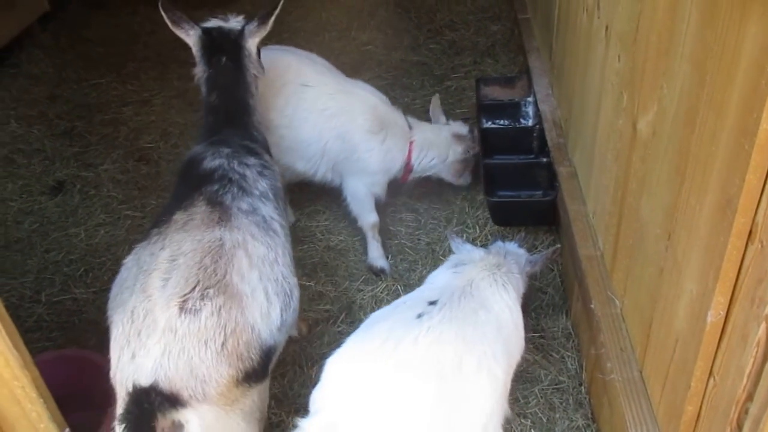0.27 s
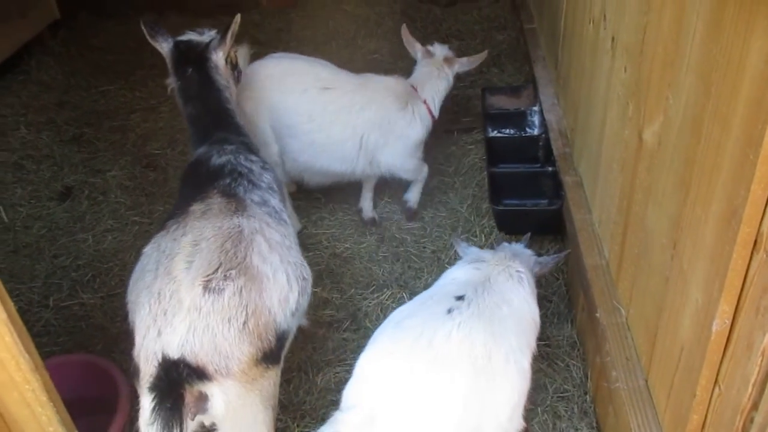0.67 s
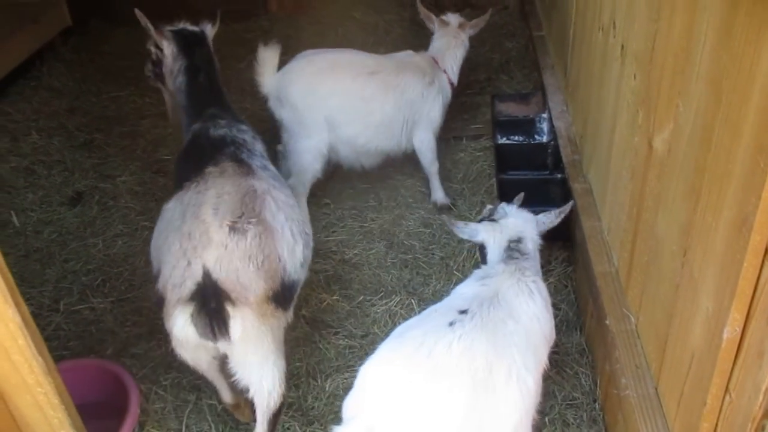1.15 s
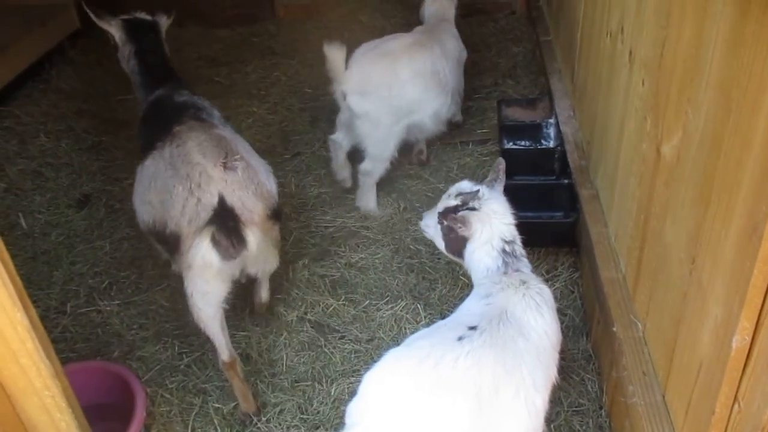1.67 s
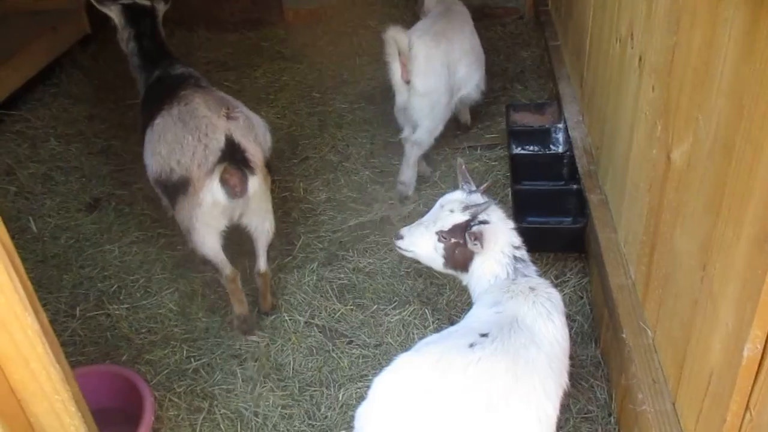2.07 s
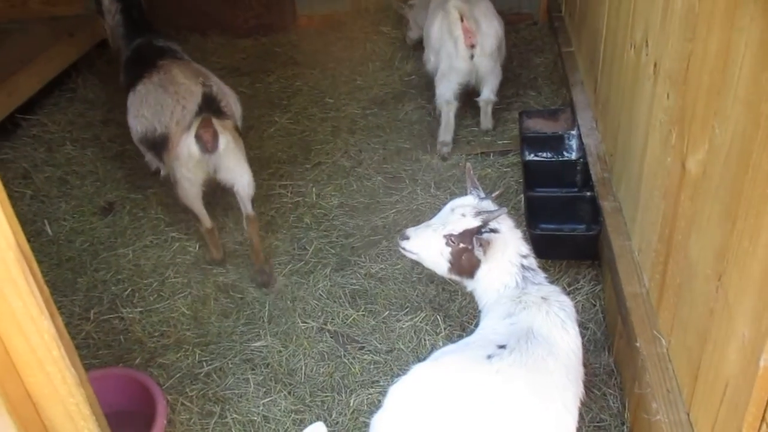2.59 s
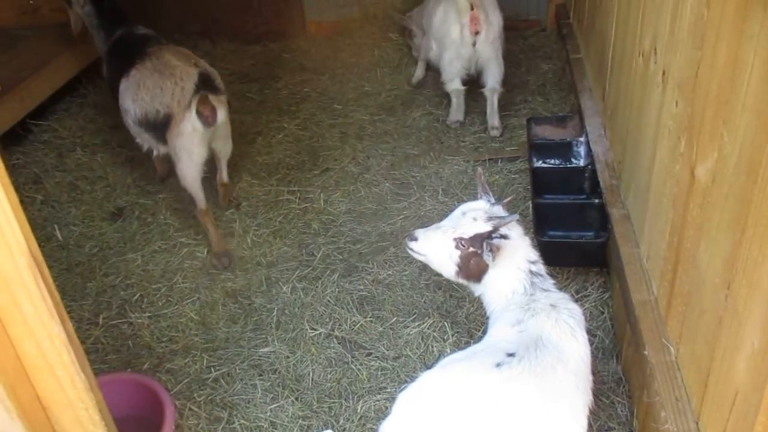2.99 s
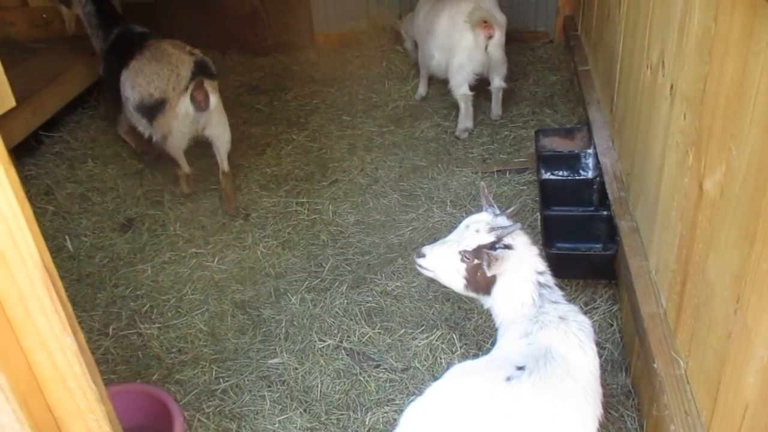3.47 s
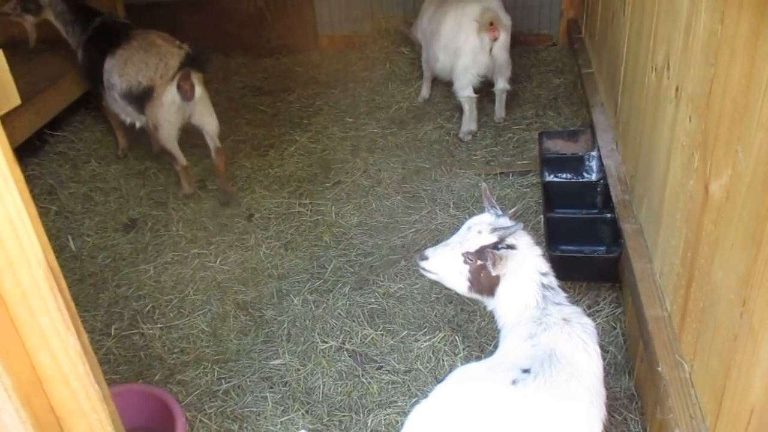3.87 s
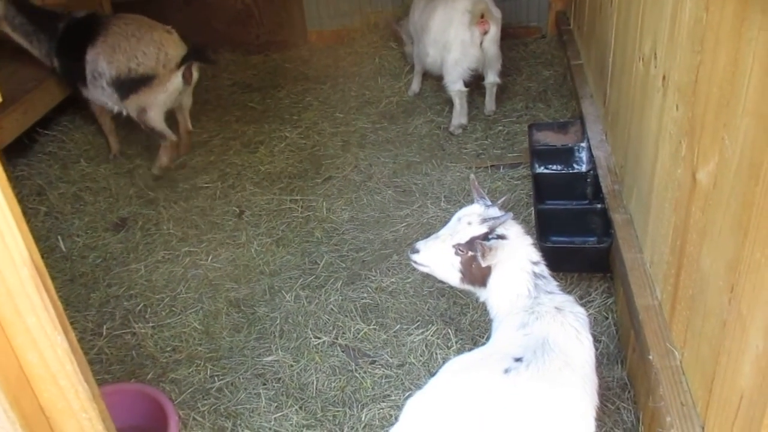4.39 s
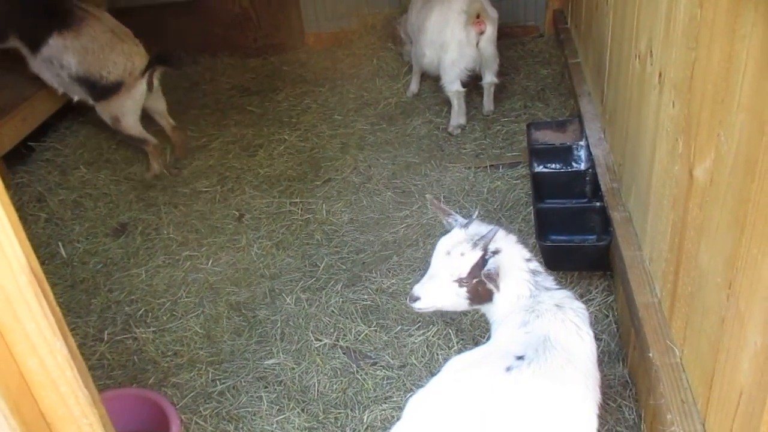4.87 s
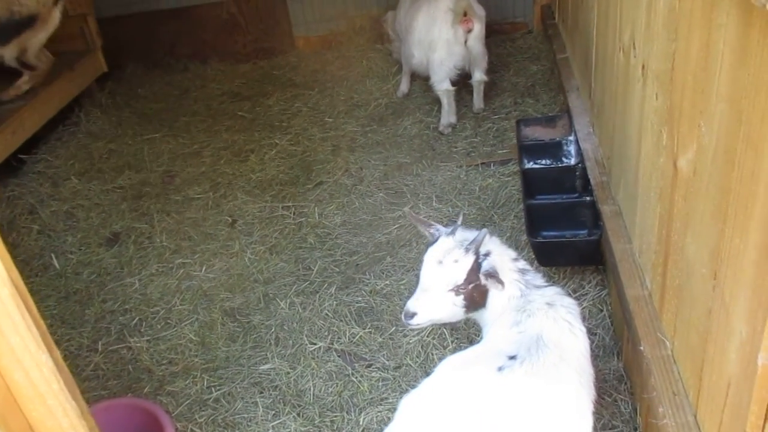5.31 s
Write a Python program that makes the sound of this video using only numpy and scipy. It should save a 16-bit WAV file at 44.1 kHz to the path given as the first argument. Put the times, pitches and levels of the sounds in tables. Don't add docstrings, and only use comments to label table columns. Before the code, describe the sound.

Close handheld sound in a straw-floored goat pen: crisp stalk snaps first, then a stuttering bleat of rapid puffs that sinks to a breathy end. Dull wind-like bumps and light wooden taps follow, then a faint distant bleat. Near the end a shelf drags with squeaky friction and bangs hard, planks ringing briefly, with short shed echo and low air noise throughout.

```python
import sys
import numpy as np
from scipy import signal
from scipy.fft import rfft, irfft, next_fast_len
from scipy.io import wavfile
from scipy.ndimage import uniform_filter1d, map_coordinates

SR = 44100
rng = np.random.default_rng(int(sys.argv[2]) if len(sys.argv) > 2 else 0)


def linear_from_db(decibels):
    return 10 ** (np.asarray(decibels, float) / 20)


def dump(signal):
    limited = np.clip(np.atleast_2d(signal).T, -1, 1)
    pcm = np.round(limited * 32767).astype(np.int16)
    wavfile.write(sys.argv[1], SR, pcm)


N = 244511
TIME = np.arange(N) / SR

# (peak time [s], level [dB], top pitch [Hz], mouth opening [0-1], upper throat resonance [Hz])
NEAR_BLEAT = [
    (.749, -21.5, 451.6, 0.77, 1680),
    (.841, -21.5, 519.3, 0.91, 1652),
    (.934, -22, 541, 0.92, 1675),
    (1.023, -24, 528.4, 0.75, 1650),
    (1.114, -24, 514, .62, 1590),
]
# (peak time [s], level [dB], top pitch [Hz], mouth opening [0-1], upper throat resonance [Hz])
FAR_BLEAT = [
    (3.334, -37.5, 431, 0.06, 1320),
    (3.43, -42, 503, 0.4, 1580),
    (3.525, -40.5, 522, 0.7, 1610),
    (3.62, -42.5, 532, 0.57, 1620),
    (3.71, -42.5, 547, .35, 1660),
    (3.809, -45, 544, 0.36, 1650),
]
# (time [s], level [dB], pitch [Hz], mouth opening [0-1])
GRUNT = [
    (.609, -40, 332, 1),
    (.619, -25, 296.3, 0.74),
    (.636, -16.5, 308, .5),
    (.65, -19.5, 321.6, 0.35),
    (.664, -30.5, 314, 1),
    (.682, -61, 312, 0.68),
]
# (time [s], level [dB], pitch [Hz], mouth opening [0-1])
SIGH = [
    (1.165, -34, 441, .4),
    (1.18, -32.5, 446.6, .25),
    (1.204, -32, 445, 0.1),
    (1.22, -40, 426.4, 0.84),
    (1.24, -41, 384, 0.75),
    (1.265, -43, 335, 0.6),
    (1.30, -43, 303, .9),
    (1.335, -52, 295, 0.9),
]
# (time from peak [s], level under peak [dB], fold tension [0-1], mouth wider by [0-1])
NEAR_PUFF = [
    (-.046, -17.5, .6, 0.16),
    (-.03, -6.5, .78, 0.11),
    (-.013, -1.5, .86, 0.0083),
    (0, -1, 1.01, 0.18),
    (0.016, -11.5, .75, .15),
    (0.039, -18.5, 0.24, 0.022),
]
# (time from peak [s], level under peak [dB], fold tension [0-1], mouth wider by [0-1])
FAR_PUFF = [
    (-.022, -25, 1.04, 0.25),
    (-.006, -.5, 1.01, .01),
    (.014, -3.5, .98, 0.09),
    (0.023, -16, 1.01, 1),
    (.055, -21, 1.15, .95),
]
# (lift near 900 Hz [dB], nasal shine above 3.4 kHz [dB], growth of shine [dB/s])
NEAR_THROAT = (5.4, -3.6, 16.4)
FAR_THROAT = (1.8, 10, 2)
# (upper resonance [Hz], lift near 900 Hz [dB], nasal shine above 3.4 kHz [dB])
GRUNT_THROAT = (1500, 5.3, -6)
SIGH_THROAT = (1650, 3.7, 2)
# (frequency [Hz], level [dB])
MOUTH_SHUT = [(250, 31), (450, -3.5), (650, -16), (1000, -15), (1500, -25), (1900, -27.5), (3000, -40.5),
              (6000, -66)]
# (frequency [Hz], level [dB])
MOUTH_OPEN = [(250, 9), (500, -0.5), (1000, -8.5), (1580, 1), (2100, -23), (2600, -19), (3200, -11.5),
              (3900, -23), (4700, -15), (5500, -34.5), (8000, -37)]
SLACK_HZ = 300.4

# (time [s], peak level [dB], ringing plank [Hz], brightness [dB], rattle t60 [ms])
BANGS = [(1.012, -28, 216, -67, 145), (2.292, -30.5, 750, -33, 33), (2.47, -27, 276, -63, 89),
         (2.581, -32, 749, -11, 61), (2.699, -37.5, 342, -63, 116), (4.65, 2.5, 900, -15.5, 36),
         (4.686, -20.5, 480, -35, 120), (4.98, -15.5, 1345, -3.5, 116), (5.035, -16, 872, -26, 230),
         (5.064, -4, 843.3, -12, 97), (5.226, -8, 387, -10, 82), (5.245, -10.5, 810, -23, 110),
         (5.295, -6, 550, -29, 122)]
# (frequency [Hz], width [Hz], level [dB])
PLANKS = [(175, 18, 2.5), (330, 92, -0.5), (480, 150, -3), (701, 110, -6.5), (832, 84, 1), (980, 216, -8),
          (1320, 130, -11.5), (1505, 140, -13), (1930, 150, -16), (2200, 180, -15), (3350, 2900, -25.5)]
# (time [s], peak level [dB], frequency [Hz], t60 [ms])
PLANK_RINGS = [(2.305, -28, 291, 120), (2.70, -33, 330, 55), (2.583, -37, 790, 56), (4.655, -3.5, 182, 110),
               (2.294, -25, 950, 49), (4.993, -17.5, 186, 100), (4.998, -31, 1400, 150),
               (5.068, -5, 321, 165), (5.07, -6.5, 200, 125), (5.231, -12.5, 443.5, 190),
               (5.233, -19, 179, 180), (5.24, -16, 821, 110), (5.299, -9, 193.4, 103)]
# (time [s], peak level [dB], frequency [Hz], t60 [ms])
BUCKET = [
    (0.07, -45, 2624, 480),
    (0.124, -50, 2740, 300),
    (2.759, -49, 2706, 420),
    (2.812, -56, 2820, 650),
    (2.884, -53, 2720, 1200),
    (2.95, -57, 2790, 550),
    (2.955, -39.5, 436, 110),
]
RISE_MS, RISE_SHARE, RISE_MS_PER_DB = 6.45, 0.047, 0.38

# (time [s], level [dB], low resonance [Hz], squeak over the drag [dB])
DRAG = [
    (4.28, -60, 719, -24),
    (4.4, -47.5, 630, -10),
    (4.54, -47.5, 650, -5),
    (4.62, -47, 806, -15),
    (4.88, -46.5, 742, -10.5),
    (4.94, -41, 839, 1),
    (4.99, -46.5, 799, -11),
    (5.17, -36.5, 810, -8),
    (5.24, -43.5, 822, -14),
    (5.5, -40.5, 667, -17.5),
]
SHELF_HZ, SQUEAK_HZ, LOOSE_HZ, LOOSE_S = 1481, 1960, 1843, 4.65

# (time [s], peak level [dB], fade [s])
STEPS = [(.07, -42, 0.072), (.65, -50.5, 0.024), (.84, -48.5, 0.34), (1.16, -47.5, 0.03), (1.43, -49, 0.14),
         (1.6, -53.5, 0.063), (1.73, -45, 0.029), (1.8, -55, 0.43), (2.04, -56.5, 0.16), (2.27, -51, 0.11),
         (2.48, -53, 0.61), (2.81, -43.5, 0.038), (2.86, -57, .15), (3.04, -51.5, 0.2), (3.26, -54, 0.056),
         (3.39, -43, 0.04), (3.5, -50, 0.21), (3.66, -47, 0.057), (3.95, -55, 0.13), (4.03, -41.5, .035),
         (4.1, -52, .28), (4.49, -46, 0.12), (4.6, -47, 0.037), (5.07, -50, 0.094), (5.28, -50, 0.13),
         (5.39, -52.5, .2), (5.54, -53, .05)]
# (time [s], peak level [dB])
SNAPS = [(0.036, -20.5), (0.0648, -25), (0.5955, -27.5), (1.276, -29), (1.4113, -40), (1.7168, -29.5),
         (1.725, -20.5), (1.8143, -31.5), (2.009, -30), (2.2643, -28.5), (2.4283, -46), (2.4708, -25),
         (2.6467, -28), (2.758, -33), (2.811, -20.5), (3.08, -34.5), (3.3805, -34), (3.43, -23),
         (3.62, -30), (3.66, -37), (4.016, -25), (4.1234, -28), (4.1797, -31), (5.2055, -32), (5.4131, -26),
         (5.4975, -27), (5.5358, -23.5)]
# (frequency [Hz], level per Hz [dB])
STALKS = [(880, -3.5), (1500, -6), (1740, -8.5), (2760, -4), (3260, -2), (6940, -4), (11900, -9.5),
          (15700, -15.5)]
STEP_RISE, SNAP_T60_S = 0.84, 0.022

# (time [s], peak level [dB], frequency [Hz])
AIR_THUDS = [(1.374, -30, 87), (1.404, -12, 167.2), (1.414, -19, 107.4), (1.44, -17.5, 97),
             (1.452, -17.5, 120), (1.468, -14, 91), (1.495, -13.5, 134), (1.572, -26, 69.5),
             (1.599, -24.5, 122), (1.614, -20, 75), (1.63, -22, 174), (1.648, -28, 109), (1.672, -16, 161),
             (2.141, -27, 107), (2.16, -17.5, 122), (2.179, -17.5, 128), (2.2, -18.5, 86),
             (2.215, -20.5, 89), (2.248, -16.5, 100), (2.313, -30, 230), (2.325, -46, 167),
             (2.394, -23, 84), (2.425, -22, 105.7), (2.474, -17, 240), (2.486, -16.5, 180),
             (2.505, -19.5, 206), (2.516, -25, 44.5),
             (0.257, -29, 51.3),
    (0.718, -26, 73.4),
    (.76, -45, 73.5),
    (0.828, -59, 79),
]
# (time [s], level [dB])
DRAUGHT = [(0, -48.5), (.55, -47), (.8, -37.5), (.92, -40.5), (1.13, -45), (1.36, -36.5), (1.53, -32.5),
           (1.73, -39.5), (1.94, -42.5), (2.33, -34), (2.55, -40), (2.65, -48), (3.2, -48), (3.55, -46),
           (3.83, -48.5), (4.54, -47.5), (5.03, -48.5), (5.54, -47)]
# (frequency [Hz], level per Hz [dB])
RUMBLE = [(12, -50), (20, -32), (33, -1), (124, -0.5), (140, -16.5), (155, -19), (250, -15.5), (320, -22),
          (550, -120)]

# (time [s], peak level [dB], fade [s])
DRONE_SWELLS = [
    (0, -43.5, 0.99),
    (.8, -42, 0.28),
    (1.07, -33, 0.11),
    (1.55, -40, 0.13),
    (2, -37.5, .2),
    (3, -46.5, 0.28),
    (3.65, -40.5, 0.48),
    (4.37, -39, 0.13),
    (5.27, -46, 0.36),
]
# (frequency [Hz], width [Hz], level [dB])
DRONE = [(1064.4, 46, -4.5), (2890, 77, -12), (5000, 278, -17)]
# (frequency [Hz], level per Hz [dB])
SHED_AIR = [(88, -27), (150, 1), (182, -4), (725, -8.5), (1050, -7), (1330, -14.5), (1670, -19.5),
            (2670, -19), (3570, -26.5), (4780, -21), (5480, -26), (12200, -31), (15700, -38)]
# (frequency [Hz], t60 [s])
SHED_ECHO = [(150, 0.22), (400, 0.181), (1200, 0.15), (4000, 0.19), (12000, 0.087)]
FADE_DB = 9.5
HUM_HZ, WHINE_HZ = 120, 11793


def unit(x):
    return x / np.sqrt(np.mean(x ** 2) + 1e-20)


def along(points, hz):
    f, v = np.transpose(points)
    return np.interp(np.log(hz + 1), np.log(f + 1), v)


def curves(rows, t=TIME):
    s, *cols = np.transpose(rows)
    return [np.interp(t, s, c) for c in cols]


def wobble(rate, size=N):
    knots = rng.standard_normal(int(size * rate / SR) + 4)
    return map_coordinates(knots, [np.arange(size) * rate / SR])


def filtered(x, response):
    m = next_fast_len(len(x) + 8192)
    return irfft(rfft(x, m) * response(np.fft.rfftfreq(m, 1 / SR)), m)[:len(x)]


def resonances(modes):
    def response(f):
        return sum((-1) ** k * linear_from_db(db) * 1j * f * w / (c * c - f * f + 1j * f * w)
                   for k, (c, w, db) in enumerate(modes))
    return response


def rush(spectrum, patchy_db):
    z = signal.stft(rng.standard_normal(N), nperseg=512)[2]
    field = uniform_filter1d(uniform_filter1d(rng.standard_normal(z.shape), 6, 0), 8, 1)
    noise = signal.istft(z * linear_from_db(patchy_db * unit(field)), nperseg=512)[1][:N]
    return unit(filtered(noise, lambda hz: linear_from_db(along(spectrum, hz))))


def swells(rows, rise):
    s, db, fade_s = np.transpose(rows)[:, :, None]
    late = (TIME - s) / fade_s
    return np.sqrt(np.sum(linear_from_db(db - FADE_DB * np.maximum(late, -late / rise)) ** 2, 0))


def add(track, s, sound):
    part = track[max(round(s * SR), 0):][:len(sound)]
    part += sound[:len(part)]


def puff_of_voice(t, db, pitch_hz, mouth, throat, jitter, breath):
    upper_hz, lift_db, shine_db = throat
    pitch_hz = uniform_filter1d(pitch_hz, 200) * (1 + jitter * wobble(148.6, size=len(t)))
    phase = 2 * np.pi * np.cumsum(pitch_hz) / SR
    k = np.arange(1, 19)[:, None]
    hz = k * pitch_hz
    near_upper = np.exp(-(np.log(hz / upper_hz) / 0.6) ** 2)
    stretched = hz * (1 + (1580 / upper_hz - 1) * near_upper)
    mouth = np.clip(mouth, 0, 1.3)
    colour_db = (1 - mouth) * along(MOUTH_SHUT, stretched) + mouth * along(MOUTH_OPEN, stretched)
    colour_db = colour_db + lift_db * np.exp(-((hz - 900) / 250) ** 2)
    soft_db = 0.4 * (db - db.max()) * (hz > 2300)
    gain = linear_from_db(colour_db + shine_db * (hz > 3400) + soft_db)
    lag = 0.31 * k + 1.01 * np.arctan((hz - upper_hz) / 250)
    tone = np.sum(gain * np.cos(k * phase - lag), 0) / np.sqrt(np.sum(gain ** 2, 0) / 2)
    leak = rng.standard_normal(len(t)) * (1 + np.cos(phase))
    leak = unit(filtered(leak, lambda f: linear_from_db(along(MOUTH_OPEN, f)) * (f > 300)))
    leak_gain = breath * linear_from_db(0.98 * (-40 - db).clip(0, 20))
    edge = np.clip(np.minimum(t - t[0], t[-1] - t) / 0.0048, 0, 1)
    swell = linear_from_db(uniform_filter1d(db, 320) + 0.8 * wobble(173, size=len(t)))
    return swell * edge * (tone + leak_gain * leak)


def bleat(puffs, shape, throat, jitter, breath):
    voice = np.zeros(N)
    lift_db, shine_db, growth_db = throat
    t = np.arange(shape[0][0], shape[-1][0], 1 / SR)
    under_db, tension, wider = curves(shape, t)
    for s, db, top_hz, mouth, upper_hz in puffs:
        pitch_hz = SLACK_HZ + tension * (top_hz - SLACK_HZ)
        nose = (upper_hz, lift_db, shine_db + growth_db * (s - puffs[0][0]))
        puff = puff_of_voice(t, db + under_db, pitch_hz, mouth + wider, nose, jitter, breath)
        add(voice, s + t[0], puff)
    return voice


def utter(rows, throat, jitter, breath):
    voice = np.zeros(N)
    t = np.arange(rows[0][0], rows[-1][0], 1 / SR)
    add(voice, t[0], puff_of_voice(t, *curves(rows, t), throat, jitter, breath))
    return voice


def near_goat():
    voice = bleat(NEAR_BLEAT, NEAR_PUFF, NEAR_THROAT, jitter=0.0094, breath=0.11)
    voice += utter(GRUNT, GRUNT_THROAT, jitter=0.008, breath=0.12)
    return voice + utter(SIGH, SIGH_THROAT, jitter=0.012, breath=0.3)


def far_goat():
    return linear_from_db(3) * bleat(FAR_BLEAT, FAR_PUFF, FAR_THROAT, jitter=0.0062, breath=0.086)


def bangs():
    out, t = np.zeros(N), np.arange(SR // 3) / SR
    for s, db, plank_hz, bright_db, t60_ms in BANGS:
        rise_ms = RISE_MS + RISE_SHARE * t60_ms + RISE_MS_PER_DB * db
        late_ms = 1000 * t - rise_ms
        build = (1000 * t / max(rise_ms, 0.5)) ** 0.89
        decay = linear_from_db(-60 * late_ms.clip(0) / max(t60_ms, 10))
        force = np.where(late_ms < 0, build, decay)
        rattle = rfft(force * rng.standard_normal(len(t)) * linear_from_db(0.98 * wobble(250, size=len(t))))
        rattle = irfft(rattle / uniform_filter1d(abs(rattle), size=60), len(t))
        modes = [(hz, w, level + rng.normal(0, 1.7)) for hz, w, level in PLANKS]
        planks = resonances(modes + [(plank_hz, 90, 0.5)])

        def tilt(hz):
            treble = linear_from_db((bright_db + 16) * hz ** 2 / (hz ** 2 + 1600 ** 2))
            return treble / (1 + 125 / (1j * hz + 1)) ** 3 / (1 + 1j * hz / 5000) ** 3

        wood = filtered(rattle, lambda hz: planks(hz) * tilt(hz))
        add(out, s, linear_from_db(db) * wood / np.max(abs(wood)))
    return out


def rings():
    out, t = np.zeros(N), np.arange(SR // 3) / SR
    for s, db, hz, t60_ms in PLANK_RINGS + BUCKET:
        decay = linear_from_db(-60000 * t / max(t60_ms, 10) + 2 * wobble(58, size=len(t)))
        shake = decay * (1 - np.exp(-t / 0.0053))
        blur = (0.65 + hz / 2200) * wobble(70 + hz / 30, size=len(t))
        add(out, s, linear_from_db(db) * shake * np.sin(2 * np.pi * hz * t + blur))
    return out


def drag():
    db, low_hz, squeak_db = curves(DRAG)
    shelf_hz = np.full(N, SHELF_HZ)
    squeak_hz = np.where(TIME < LOOSE_S, SQUEAK_HZ, LOOSE_HZ)

    def sway(hz, width_hz):
        turning = np.exp(2j * np.pi * np.cumsum(hz) / SR)
        return np.real(turning * (wobble(width_hz) + 1j * wobble(width_hz)))

    wood = sway(shelf_hz, 150) + linear_from_db(-2.5) * sway(0.98 * shelf_hz, 650)
    wood += linear_from_db(-1) * sway(low_hz, 260)
    wood += linear_from_db(-20) * sway(np.full(N, 5147.5), 300)
    wood += linear_from_db(squeak_db) * sway(squeak_hz, 110)
    onset = np.clip((TIME - DRAG[0][0]) / 0.066, 0, 1)
    return linear_from_db(db + 1.3 * wobble(40)) * wood * onset


def straw():
    grains = linear_from_db(1.5 * wobble(900) + 2.9 * wobble(45))
    rustle = linear_from_db(1) * swells(STEPS, STEP_RISE) * unit(grains * rush(STALKS, patchy_db=-1.5))
    snaps, t = np.zeros(N), np.arange(SR // 10) / SR
    for s, db in SNAPS:
        level_db = db - 8.5 - 60 * t / SNAP_T60_S + 4.1 * wobble(770, size=len(t))
        add(snaps, s, linear_from_db(level_db) * rng.standard_normal(len(t)))
    return rustle + filtered(snaps, lambda hz: linear_from_db(along(STALKS, hz) + 2.5))


def thuds():
    out, t = np.zeros(N), np.arange(-SR // 20, SR // 20) / SR
    for s, db, hz in AIR_THUDS:
        swing = np.cos(2 * np.pi * hz * t + rng.uniform(0, 2 * np.pi))
        add(out, s + t[0], linear_from_db(db) * np.exp(-(t * hz / 0.45) ** 2) * swing)
    return out


def draught():
    level_db, = curves(DRAUGHT)
    return linear_from_db(level_db + 1.9 * wobble(20)) * rush(RUMBLE, patchy_db=0)


def far_drone():
    tone = unit(filtered(rng.standard_normal(N), lambda hz: resonances(DRONE)(hz) ** 2))
    return swells(DRONE_SWELLS, rise=0.72) * linear_from_db(-10.5 + 1.6 * wobble(15)) * tone


def background():
    air = linear_from_db(-47.5 + 0.69 * wobble(4.67)) * rush(SHED_AIR, patchy_db=1)
    hum = linear_from_db(-51 + 3 * wobble(15)) * np.sin(2 * np.pi * HUM_HZ * TIME + 0.63 * wobble(3.6))
    whine = linear_from_db(-72 + 3 * wobble(20)) * np.sin(2 * np.pi * WHINE_HZ * TIME + 0.6 * wobble(15))
    return air + hum + whine


def shed(x):
    hz, t, z = signal.stft(rng.standard_normal(SR // 2), SR, nperseg=256)
    tail = signal.istft(z * linear_from_db(-60 * t / along(SHED_ECHO, hz)[:, None]), SR, nperseg=256)[1]
    delayed = np.pad(x, (350, 0))
    return signal.fftconvolve(delayed, tail / np.linalg.norm(tail))[:N]


def scene():
    near, far = near_goat(), far_goat()
    wood = bangs() + rings()
    direct = near + far + wood + drag() + straw() + thuds() + draught() + far_drone() + background()
    echo = linear_from_db(-11) * shed(near) + linear_from_db(-8.5) * shed(far) + linear_from_db(-9.5) * shed(wood)
    return (direct + echo)[None]


def top_cut(x):
    return signal.sosfilt(signal.butter(12, 15820, fs=SR, output="sos"), x)


def record(dry):
    hop = 64
    over_db = np.maximum(20 * np.log10(abs(dry[0]) + 1e-9) + 16, 0)
    over_db = over_db[:N // hop * hop].reshape(-1, hop).max(1)
    climb = 7 * hop / SR * np.arange(len(over_db))
    duck_db = np.maximum.accumulate(0.28 * over_db + climb) - climb
    duck_db = uniform_filter1d(np.pad(duck_db, (8, 0)), 12)
    gain_db = -np.interp(np.arange(N) / hop, np.arange(len(duck_db)), duck_db)
    return top_cut(np.clip(dry * linear_from_db(gain_db), -0.97, 0.97))


dry = scene()
out = record(dry)
dump(out)
```